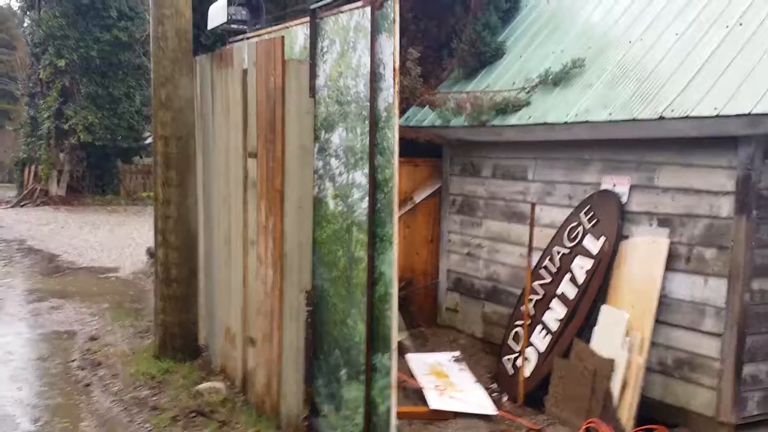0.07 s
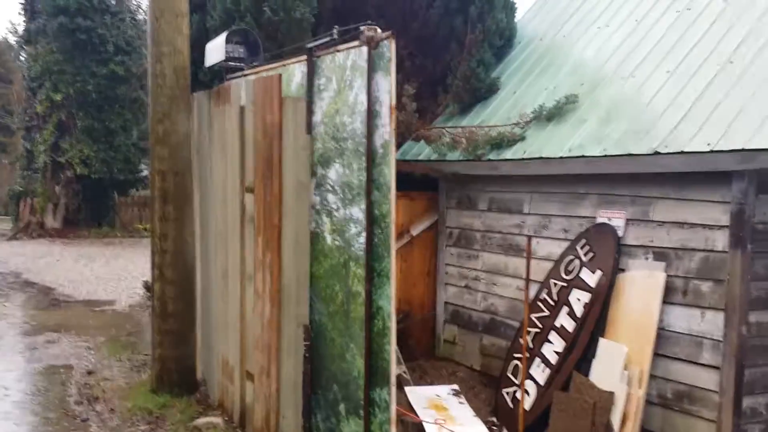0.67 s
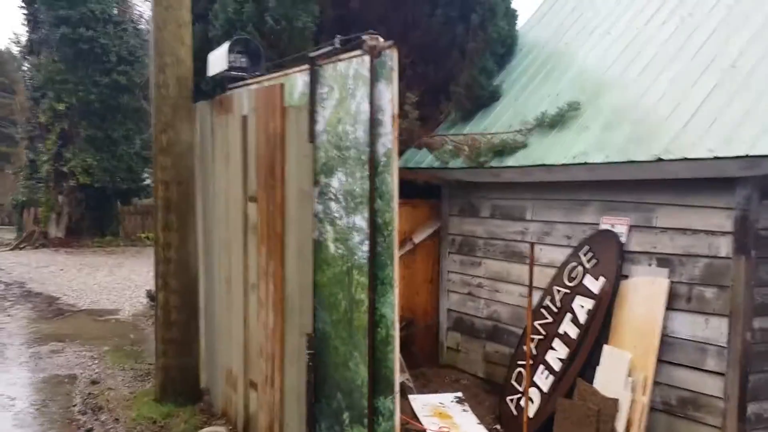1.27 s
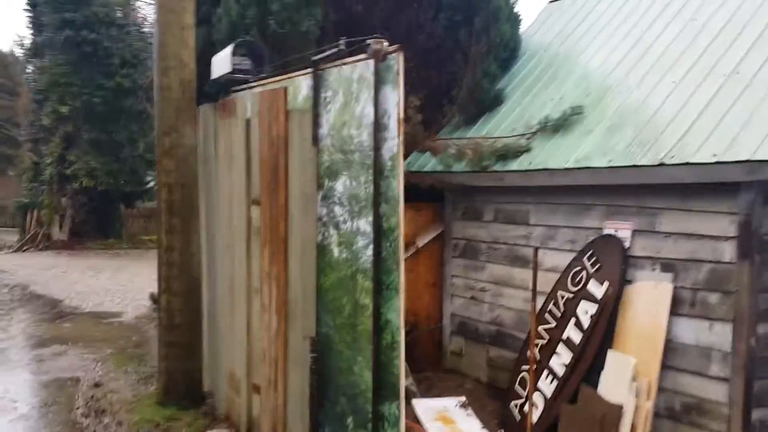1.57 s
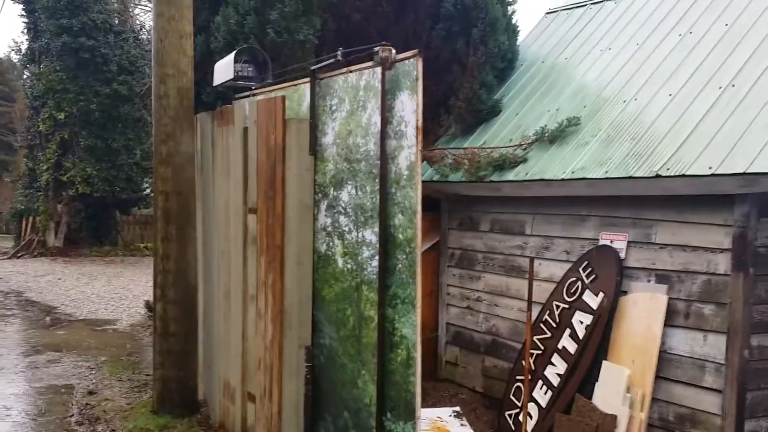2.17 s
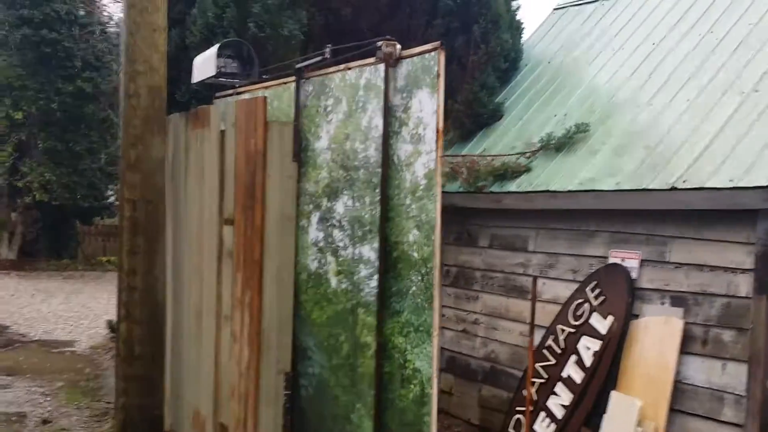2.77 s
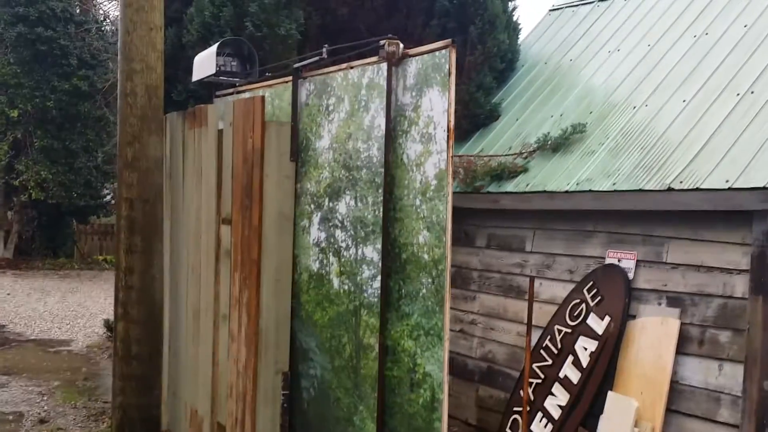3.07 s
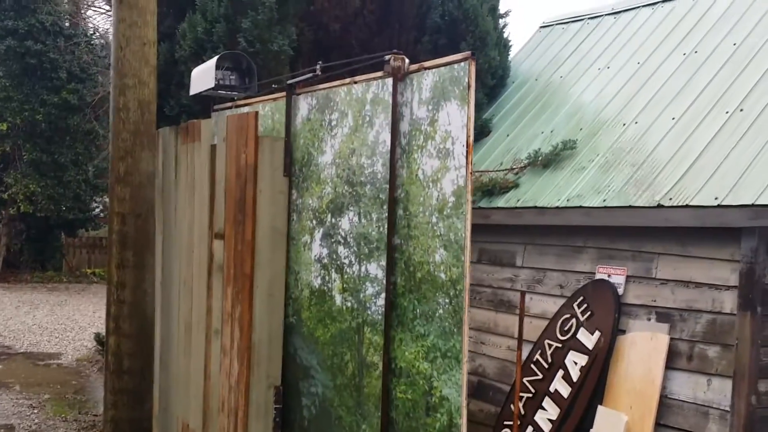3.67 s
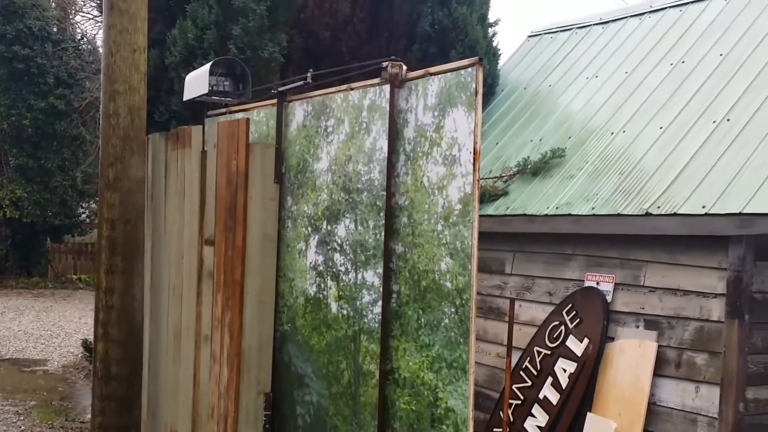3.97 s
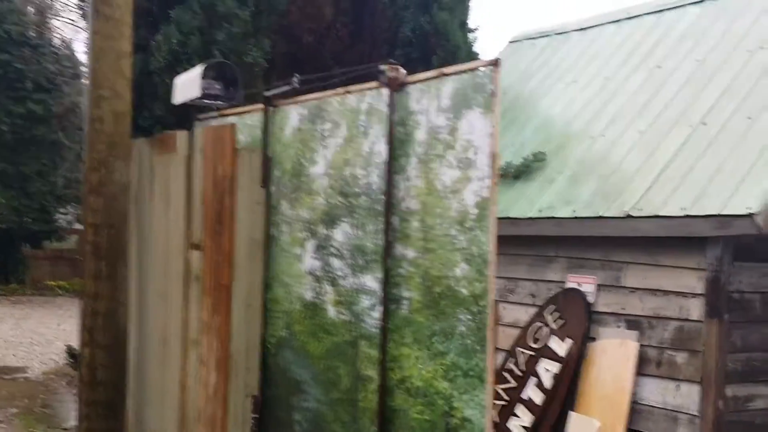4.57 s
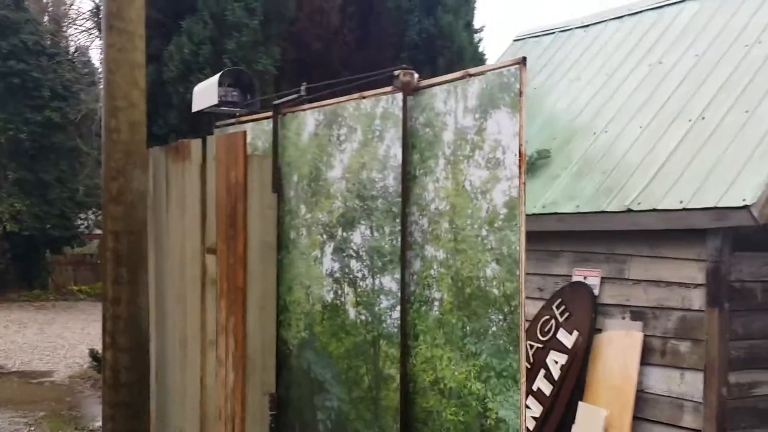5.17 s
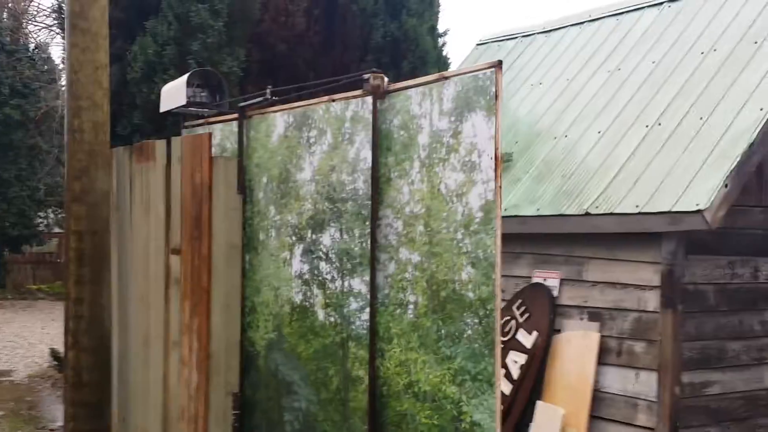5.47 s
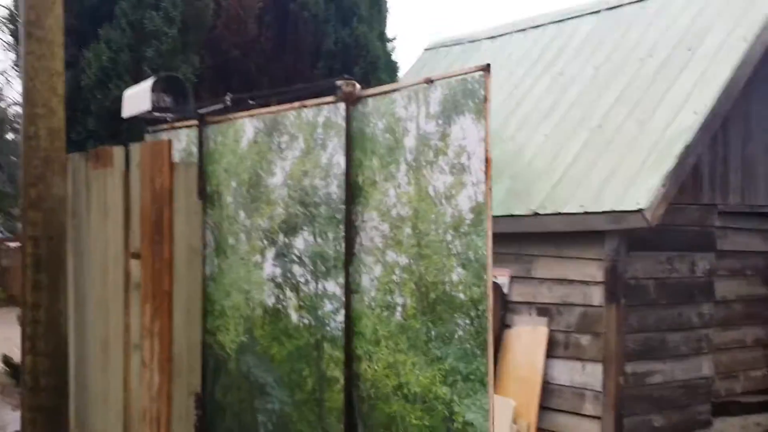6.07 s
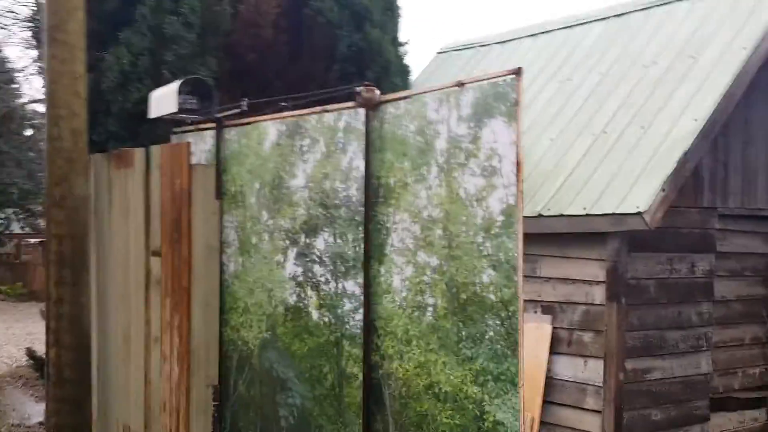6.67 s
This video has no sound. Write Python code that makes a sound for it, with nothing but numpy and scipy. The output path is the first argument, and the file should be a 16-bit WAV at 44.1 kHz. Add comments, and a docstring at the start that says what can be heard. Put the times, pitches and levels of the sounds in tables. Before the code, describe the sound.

Outdoor hiss and a faint idling engine fade in, a few metres from a motorised sliding gate. Its drive whirrs and drops in pitch, with one microphone pop, then the panel rolls out over a low hum. It rumbles and scrapes over rough spots, ticking, knocking and squealing thinly. The grinding grows harder and moves to the right, and the handheld microphone takes a soft bump late on.

```python
"""A wet yard, a handheld camera's two microphones a few metres from a motorised gate sliding out.
The drive whirrs and its motor hums; the rollers rumble through the panel, grind, and scrape over
rough spots; an edge squeals thinly and the frame knocks, with a few sharp ticks. Behind the gate
an engine idles in the outdoor hiss. The sound fades in, the right microphone pops once, and
later the camera body takes a soft knock."""
import sys
import numpy as np
from scipy import signal
from scipy.fft import rfft, irfft, next_fast_len
from scipy.io import wavfile
from scipy.ndimage import uniform_filter1d

SR = 44100
rng = np.random.default_rng(int(sys.argv[2]) if len(sys.argv) > 2 else 0)


def waveform_to_disk(signal):
    """Save audio, clipped to [-1, 1], as 16-bit WAV at the path in sys.argv[1]."""
    frames = np.transpose(np.atleast_2d(signal))
    scaled = np.clip(frames, -1, 1) * 32767
    samples = np.round(scaled).astype(np.int16)
    wavfile.write(sys.argv[1], SR, samples)


N = 304731
TIME = np.arange(N) / SR
SIZE = next_fast_len(N, real=True)
HZ = np.fft.rfftfreq(SIZE, 1 / SR)

# How alike the two microphones hear. Each row: frequency in Hz, likeness from 0 to 1.
MIC_LIKENESS = [(60, .96), (150, .98), (300, .97), (640, .9), (950, .65), (1400, .68), (1900, .2),
                (3200, .1), (7000, .12), (15000, .05)]
# Resonances of the gate panel. Each row: frequency in Hz, width in Hz, lift in dB.
PANEL_RESONANCES = [(263, 22, 4), (373.2, 12.6, 11.5), (446, 18, 5), (615, 81, 5), (730, 43, 4.5),
                    (880, 25, 4), (1054, 19, 7.5), (1143, 23, 8), (1217, 15, 3.5), (1249, 24, 8),
                    (1350, 16, 6), (1453, 12, 3), (1860, 200, 7)]


def gain_of(db):
    """Decibels to amplitude."""
    return 10 ** (np.asarray(db) / 20)


def unit_rms(x):
    """Scales to an rms of one."""
    return x / np.sqrt(np.mean(x ** 2) + 1e-20)


def spectrum(points, hz=HZ):
    """A frequency table, joined on a log-frequency axis."""
    f, value = np.transpose(points)
    return np.interp(np.log(hz + 1), np.log(f + 1), value)


def curves(rows):
    """Each column of a time table, at every sample."""
    times, *columns = np.transpose(rows)
    return [np.interp(TIME, times, column) for column in columns]


def lift(resonances):
    """Gain in dB that a body's resonances give at each frequency."""
    return sum(db / (1 + (2 * (HZ - hz) / width) ** 2) for hz, width, db in resonances)


def colour(x, db):
    """Filters by a gain in dB at each frequency."""
    return irfft(rfft(x, SIZE) * gain_of(db), SIZE)[..., :N]


def wander(rate_hz):
    """Random drift of unit rms, up to the given rate."""
    white = rfft(rng.standard_normal(SIZE))
    return unit_rms(irfft(white / (1 + (HZ / rate_hz) ** 4), SIZE)[:N])


def pair_noise():
    """White noise at two microphones: alike in the bass, unrelated in the treble."""
    a, b = rfft(rng.standard_normal((2, SIZE)))
    same = np.clip(spectrum(MIC_LIKENESS), 0, 1)
    mid, side = a * np.sqrt((1 + same) / 2), b * np.sqrt((1 - same) / 2)
    return irfft(np.array([mid + side, mid - side]), SIZE)[:, :N]


def friction(spectrum_db, rough_db, slip_hz):
    """Dense tiny slips that come in clumps, coloured by what they shake."""
    slips = pair_noise() * gain_of(rough_db * wander(slip_hz))
    return unit_rms(colour(slips, spectrum_db))


def sing(x, hz, width_hz):
    """Three passes through a resonance that follows the curve hz narrow noise to a fuzzy tone."""
    turn = np.exp(2j * np.pi * np.cumsum(hz) / SR)
    pole = np.exp(-np.pi * width_hz / SR)
    for _ in range(3):
        x = 2 * (turn * signal.lfilter([1 - pole], [1, -pole], x / turn)).real
    return unit_rms(x)


def strike(modes, t, pitch_hz, spread_octaves, steepness):
    """Dying modes, strongest near the blow's pitch, summed to a peak of one at each microphone."""
    ring = 0
    for hz, db, t60 in modes:
        falloff = (1 + (np.log2(hz / pitch_hz) / spread_octaves) ** 2) ** steepness
        phase = rng.random() + (1 - spectrum(MIC_LIKENESS, hz)) * rng.random((2, 1))
        ring += gain_of(db - 60 * t / t60) / falloff * np.sin(2 * np.pi * (hz * t + phase))
    return ring / abs(ring).max(axis=1, keepdims=True)


def place(mix, start, db, pan_db, sound):
    """Adds a short sound at its time, level and side."""
    part = mix[:, round(start * SR):][:, :sound.shape[1]]
    part += gain_of(db + np.array([[pan_db], [-pan_db]]) / 2) * sound[:, :part.shape[1]]


def yard(level_db=-45.5):
    """Even outdoor hiss, all around the microphones."""
    # The open air. Each row: frequency in Hz, relative level in dB.
    air = [(15, -45), (35, -32), (60, -3), (100, -2.5), (200, -6), (370, -8), (480, -17), (850, -42),
           (1400, -13.5), (1920, -10), (2500, -17), (3400, -18.5), (6200, -25.5), (14000, -33.5)]
    return gain_of(level_db) * friction(spectrum(air), rough_db=3.0, slip_hz=201)


def engine(crank_hz=16.42, unsteady=0.24):
    """A distant idle: only the low orders of the crank carry, throbbing once a turn."""
    # Engine orders. Each row: multiple of the crank speed, level in dB.
    orders = [(2, -88), (3, -53), (4, -61), (5, -58), (6, -63), (7, -59.5), (9, -69)]
    turns = crank_hz * np.cumsum(1 + 0.0025 * wander(2.8)) / SR
    idle = np.zeros(N)
    for order, db in orders:
        amplitude = gain_of(db) * np.sqrt(2) * (1 + unsteady * wander(2.8))
        idle += amplitude * np.cos(2 * np.pi * order * turns + rng.normal(0, 1.0))
    return idle


def roller_forces(uneven_db=1.13, uneven_hz=9):
    """Strength of rumble, grinding and hiss: uneven rolling plus a surge at every rough spot."""
    # Rolling builds as the gate comes out. Each row: time in seconds, rumble, grinding, hiss in dB.
    rolling = [(0.8, -47.5, -57, -52), (0.95, -44, -56, -49), (1.52, -49, -48.5, -50),
               (1.76, -43, -45, -50.5), (1.89, -43, -54, -53), (1.97, -46, -49, -50),
               (2.12, -41, -42.5, -48), (3.48, -39.5, -41, -46), (4.18, -40, -41.5, -47),
               (4.75, -38, -46, -46), (4.99, -40, -43.5, -46.5), (5.53, -39.5, -45, -46),
               (5.92, -40, -42.5, -46), (6.66, -38.5, -37, -44)]
    # Rough spots. Each row: start in seconds, rumble, grinding, hiss in dB, rise and fade in seconds.
    scrapes = [(1.498, -39, -34, -42.5, 0.015, 0.036), (1.649, -42, -32.5, -43, 0.0052, 0.023),
               (1.921, -57, -40, -45, 0.005, 0.041), (2.006, -44, -32, -44.5, 0.005, 0.062),
               (2.034, -32, -41, -56, 0.0053, 0.076), (2.139, -48, -41, -61, 0.038, 0.11),
               (2.232, -38.5, -30.5, -39.5, 0.024, 0.051), (2.514, -35.5, -40, -44.5, 0.013, 0.062),
               (2.81, -39.5, -35.5, -45, 0.063, 0.059), (3.113, -33, -35, -41.5, 0.0036, 0.032),
               (3.22, -43, -38, -49, 0.049, 0.097), (3.298, -50, -36, -39.5, 0.018, 0.022),
               (3.772, -35, -34, -46, 0.046, 0.079), (4.264, -37, -43, -60, 0.0035, 0.043),
               (4.436, -39, -55, -52, 0.012, 0.03), (4.52, -37.5, -38, -44, 0.039, 0.05),
               (4.675, -38, -33, -39, 0.008, 0.074), (4.753, -51, -31.5, -43, 0.0055, 0.053),
               (4.858, -39.5, -66, -49, 0.0025, 0.037), (5.15, -38, -36, -46, 0.028, 0.057),
               (5.183, -37, -33.5, -37.5, 0.0083, 0.075), (5.228, -44, -34, -47, 0.0046, 0.077),
               (5.35, -38, -36, -47, 0.023, 0.06), (5.501, -32.5, -27, -39, 0.0087, 0.038),
               (5.547, -33.5, -34, -48, 0.0072, 0.11), (5.612, -47, -31, -37, 0.012, 0.059),
               (5.665, -35, -38, -37.5, 0.016, 0.063), (5.837, -42, -48, -40, 0.0041, 0.042),
               (6.125, -50, -35, -50, 0.016, 0.019), (6.293, -55, -48, -39, 0.0073, 0.04),
               (6.401, -52, -45, -39.5, 0.0031, 0.015), (6.575, -39, -36, -48, 0.02, 0.03),
               (6.698, -39, -31, -40.5, 0.013, 0.046), (6.758, -49, -26, -45, 0.015, 0.046),
               (6.852, -29.5, -41, -43.5, 0.0041, 0.034)]
    power = gain_of(np.array(curves(rolling)) + uneven_db * wander(uneven_hz)) ** 2
    for start, rumble_db, grind_db, hiss_db, rise, fade in scrapes:
        age = TIME - start
        surge = np.clip(age / rise, 0, 1) * np.exp(-(np.maximum(age - rise, 0) / fade) ** 2)
        power += (gain_of([[rumble_db], [grind_db], [hiss_db]]) * surge) ** 2
    return np.sqrt(power)


def rumble(force):
    """The rollers shake the gate panel and its resonances."""
    # Panel rumble. Each row: frequency in Hz, relative level in dB.
    tone = [(30, -19), (70, -1), (130, 0), (190, 2), (290, 0.5), (380, -7), (480, -2), (700, -4.5),
            (1000, -7), (1600, -23), (3000, -42), (16000, -66)]
    return force * friction(spectrum(tone) + lift(PANEL_RESONANCES), rough_db=1.5, slip_hz=49.7)


def grinding(force, ring_width_hz=400, ring_lift_db=3.0):
    """Slips at the roller contact ring it lower, harder and further right as the gate comes out."""
    # The slips. Each row: frequency in Hz, relative level in dB.
    tone = [(200, -19), (600, -8), (950, 0), (1400, 0.5), (1800, -5), (2200, -3), (2900, -15), (4500, -44),
            (16000, -81)]
    # The contact. Each row: time in seconds, resonance in Hz, ringing in dB, left over right in dB.
    contact = [(1.6, 1780, -10, -1), (2.0, 1396, -6.5, -1.5), (3.85, 1470, -3.5, -1.5), (4.4, 1420, -1, -4),
               (4.78, 1338, 4.5, -9.5), (5.65, 1299, 1, -6.5), (6.3, 1337, 3, -9), (6.8, 1390, 7.5, -7.5)]
    hz, ring_db, pan_db = curves(contact)
    panel_db = lift(PANEL_RESONANCES)
    slips = friction(spectrum(tone) + panel_db, rough_db=1.0, slip_hz=120)
    ring = sing(friction(panel_db, rough_db=2.0, slip_hz=108), hz, ring_width_hz)
    share = gain_of(ring_db + ring_lift_db)
    blend = (slips + share * ring) / np.hypot(1, share)
    return force * blend * gain_of([pan_db / 2, -pan_db / 2])


def rubbing(force, hiss_db=3, grit_per_s=90, grit_db=-6, size_spread_db=2.0, grit_decay_s=0.00091):
    """Hiss along the track, with grains of grit cracking under the rollers."""
    # Rubbing hiss. Each row: frequency in Hz, relative level in dB.
    tone = [(1000, 3), (2500, -1), (3500, -1.5), (4700, 1), (6800, 1.5), (8400, -2.5), (10500, -7),
            (12000, -8), (14500, -16.5)]
    # Resonances of the steel track. Each row: frequency in Hz, width in Hz, lift in dB.
    track = [(4800, 39, 3), (5120, 50, 5.5), (5580, 38, 2), (6232, 30, 1.5), (6993, 45, 5.5),
             (11550, 260, 1), (9900, 120, 1.5), (10300, 50, 2), (10500, 50, 4)]
    hiss = friction(spectrum(tone) + lift(track), rough_db=0.5, slip_hz=400)
    hiss *= gain_of(hiss_db + 0.77 * wander(36))
    cracks = rng.random(N) < grit_per_s / SR
    sizes = gain_of(size_spread_db * np.minimum(rng.exponential(1, N), 4))
    bursts = signal.lfilter([1], [1, -np.exp(-1 / (grit_decay_s * SR))], cracks * sizes)
    grit = unit_rms(colour(pair_noise() * bursts, spectrum(tone)))
    return force * (hiss + gain_of(grit_db) * grit)


def whirr(upper_ratio=1.77, upper_width_hz=800, jitter=.018, jitter_hz=40):
    """Two fuzzy resonances of the drive tremble, swell and sink as the gate starts to move."""
    # The pitch sags as the drive takes up the load. Each row: time in seconds, pitch in Hz.
    sag = [(0.85, 2020), (1.27, 1760), (1.45, 1678), (1.62, 1520), (1.79, 1360)]
    # Swells. Each row: peak time in seconds, level in dB, upper resonance over lower in dB,
    # width of the lower in Hz, half length in seconds.
    swells = [(0.96, -48.5, -16, 1500, 0.21), (1.426, -45.5, -4, 360, 0.19), (1.723, -45.5, -17, 380, 0.13)]
    out = np.zeros((2, N))
    pitch = curves(sag)[0] * (1 + jitter * wander(jitter_hz))
    for peak_s, db, upper_db, width_hz, half_length in swells:
        span = abs(TIME - peak_s) < .5
        age, hz = TIME[span] - peak_s, pitch[span]
        drive = rng.standard_normal((2, N))[:, span]
        lower = sing(drive, hz, width_hz)
        upper = gain_of(upper_db) * sing(drive, hz * upper_ratio, upper_width_hz)
        out[:, span] += gain_of(db) * np.exp(-(age / half_length) ** 4) * (lower + upper)
    return out


def microphone_pop(level_db=-.3, corner_hz=98, damping=.63):
    """A sudden step at the right microphone; its bass cut turns it into a spike and an undershoot."""
    # The pop and its small rebound. Each row: start in seconds, relative size in dB.
    jumps = [(1.1823, 0), (1.1964, -20)]
    step = sum((-1) ** k * gain_of(db) * (TIME >= start) for k, (start, db) in enumerate(jumps))
    omega = 2 * np.pi * corner_hz
    bass_cut = signal.bilinear([1, 0, 0], [1, 2 * damping * omega, omega ** 2], SR)
    spike = uniform_filter1d(signal.lfilter(*bass_cut, step), size=3)
    return np.array([np.zeros(N), gain_of(level_db) * spike])


def ticks(crack_db=-16, wall_db=-29, lowest_hz=3000):
    """Each tick cracks and rings very short modes, with no bass; the shed wall answers faintly."""
    # Hard little ticks. Each row: start in seconds, level in dB, pitch in Hz, spread in octaves,
    # left over right in dB.
    hits = [(1.280, -28, 8300, .25, -2), (1.562, -10, 7500, 2.2, 7), (1.715, -19, 6700, 0.7, 0),
            (1.788, -22, 3930, 0.5, 12), (1.8274, -26, 6500, 0.32, -1), (2.012, -25, 7400, .2, 0),
            (2.511, -24, 8700, .4, 0), (2.680, -12.5, 8800, 2.4, 9), (2.8884, -24, 3900, .4, 7),
            (3.315, -22, 5600, .3, 3), (3.6473, -25, 7300, 0.67, -4), (5.007, -23.5, 3800, .2, -2),
            (5.3853, -32, 13500, .5, -3), (5.846, -20.5, 5600, 1.6, -1), (5.857, -27, 14000, .2, -2),
            (6.488, -23.5, 3700, 0.43, -4)]
    # What a tick rings. Each row: frequency in Hz, relative level in dB, seconds to fall 60 dB.
    modes = [(3860, 5, 0.0031), (5370, -4, 0.0045), (7000, -2, 0.0045), (8700, -5, 0.0025),
             (12100, 5, 0.0029), (13700, 2, 0.0026)]
    out, t = np.zeros((2, N)), np.arange(1024) / SR
    scatter = gain_of(crack_db - 60 * t / 0.0013) + gain_of(wall_db - 60 * t / 0.053)
    for start, db, pitch_hz, spread_octaves, pan_db in hits:
        ring = strike(modes, t, pitch_hz, spread_octaves, steepness=2)
        place(out, start, db, pan_db, ring + scatter * rng.standard_normal((2, len(t))))
    return signal.sosfilt(signal.butter(4, lowest_hz, "highpass", fs=SR, output="sos"), out)


def motor(level_db=-42, peak_s=3.3, build_db_per_s=2, ease_db_per_s=1.0, rise_s=0.072, drift_rad=.2):
    """Mains hum and gear tones come in, build and ease off, wavering with the load."""
    # Motor tones, mains hum first. Each row: frequency in Hz, relative level in dB,
    # depth of wavering, start in seconds.
    tones = [(119.9, 0, .12, 1.97), (267.5, -7, .35, 1.8), (263, -15, .6, 1.8), (599.7, -14.5, .5, 1.97)]
    # The hum's octave swells and dips slowly. Each row: time in seconds, level in dB.
    octave_levels = [(1.72, -48), (2.7, -51), (3.25, -44.5), (4.9, -44.5), (5.35, -48.5), (6.0, -46.5),
                     (6.5, -42), (6.9, -46)]
    hum = np.zeros(N)
    for hz, db, unsteady, start in tones:
        waver = (1 + unsteady * (wander(5.4) + 1j * wander(1.0))) / np.sqrt(1 + 2 * unsteady ** 2)
        running = np.clip((TIME - start) / rise_s, 0, 1)
        hum += running * gain_of(db) * np.sqrt(2) * (waver * np.exp(2j * np.pi * hz * TIME)).real
    past_peak = TIME - peak_s
    hum *= gain_of(level_db + np.minimum(build_db_per_s * past_peak, -ease_db_per_s * past_peak))
    octave_hz, octave_start = 2 * tones[0][0], octave_levels[0][0]
    swell = gain_of(curves(octave_levels)[0]) * np.clip((TIME - octave_start) / rise_s, 0, 1)
    return hum + swell * np.sqrt(2) * np.cos(2 * np.pi * octave_hz * TIME + drift_rad * wander(2))


def knocks(spread_octaves=0.47, contact_s=0.0019):
    """The frame knocks against its guide, and each blunt blow rings it for a moment."""
    # Blows. Each row: start in seconds, level in dB, pitch in Hz, left over right in dB.
    blows = [(2.037, -22, 664, -2), (2.046, -27, 151, 0), (2.048, -25, 1150, -2), (2.063, -29.5, 290, -2),
             (2.537, -29, 330, -3), (2.564, -26.5, 287, -4), (3.116, -24, 610, -3), (3.122, -30, 1100, -3),
             (4.448, -27.5, 523, -3), (4.496, -24.5, 1410, -4), (4.563, -22.5, 610, -4),
             (4.758, -24, 1400, -3), (4.861, -25, 290, -3), (5.518, -23, 1200, -5), (5.524, -19, 835, -5),
             (5.625, -23, 1320, -3), (5.672, -16, 1220, -6), (5.696, -26, 500, -3), (6.403, -25, 1350, -6),
             (6.705, -16.5, 1350, -6), (6.738, -23, 1400, -8), (6.776, -17, 1430, -8),
             (6.797, -16, 1300, -5), (6.809, -20, 1250, -7), (6.855, -20.5, 463, -2.5),
             (6.860, -24, 1090, -4)]
    # The frame's modes. Each row: frequency in Hz, relative level in dB, seconds to fall 60 dB.
    modes = [(133, -3, 0.087), (243.6, 6, 0.099), (290, 2, .09), (451, -1.5, 0.1), (607, 1, 0.085),
             (849, 0, 0.06), (1171, 2.5, 0.032), (1307, -6, 0.074), (1370, -2, 0.039), (1500, -1.5, 0.035)]
    out, t = np.zeros((2, N)), np.arange(8192) / SR
    attack = np.minimum(t / contact_s, 1)
    for start, db, pitch_hz, pan_db in blows:
        ring = strike(modes, t, pitch_hz, spread_octaves, steepness=1.19)
        place(out, start, db, pan_db, attack * ring)
    return out


def squeals(lower_ratio=0.591, rough_db=2.5, drift=.008, drift_hz=14, rise_s=.03, release_s=.03):
    """A rubbing edge sings roughly in two drifting high modes, broken up by tiny slips."""
    # Thin squeals. Each row: start and hold in seconds, upper and lower mode levels in dB,
    # upper mode in Hz, width in Hz.
    rubs = [(2.047, 0.78, -56.5, -60, 9800, 2193), (2.194, 0.1, -45.5, -41, 10140, 1500),
            (2.26, 0.57, -56.5, -61, 9960, 900), (2.827, 0.042, -41, -43, 10040, 1400),
            (3.278, 0.25, -48, -45.5, 10080, 1410), (4.32, 0.056, -47, -51, 10400, 2000),
            (4.516, 0.24, -50.5, -55.5, 10300, 2600), (6.238, 0.39, -59, -49, 8400, 700),
            (6.56, 0.1, -62, -46, 9750, 1000), (6.706, 0.077, -44.5, -42, 9500, 1600)]
    out, drive = np.zeros((2, N)), pair_noise()
    for start, hold, upper_db, lower_db, upper_hz, width_hz in rubs:
        span = (TIME >= start) & (TIME < start + hold + .5)
        age = TIME[span] - start
        swell = (1 - np.exp(-age / rise_s)) * np.exp(-np.maximum(age - hold, 0) / release_s)
        hz = upper_hz * (1 + drift * wander(drift_hz)[span])
        upper = gain_of(upper_db) * sing(drive[:, span], hz, width_hz)
        lower = gain_of(lower_db) * sing(drive[:, span], hz * lower_ratio, width_hz)
        out[:, span] += swell * (upper + lower)
    return out * gain_of(rough_db * wander(67))


def camera_bump(decay_s=0.012, left_db=-12):
    """A dull thud through the camera body, mostly at the right microphone."""
    # One soft knock: start in seconds, level in dB, pitch in Hz.
    knock = (6.012, -22, 103)
    start, db, hz = knock
    age = np.maximum(TIME - start, 0)
    thud = np.sin(2 * np.pi * hz * age) * np.exp(-(age / decay_s) ** 2 / 2)
    return gain_of([[db + left_db], [db]]) * thud


def scene():
    """The gate and its motor stand a few metres off, a little to the right."""
    # Balance of the two microphones. Each row: frequency in Hz, left over right in dB.
    balance = [(60, -2), (200, -2.5), (700, -3), (1300, -9), (2200, -4.5), (3100, 2), (4300, -2),
               (5500, -3), (7200, -1), (9500, -2), (12000, 1), (13700, 5.5)]
    rumble_force, grind_force, rub_force = roller_forces()
    outdoors = (rumble(rumble_force) + rubbing(rub_force) + squeals() + whirr() + motor()
                + engine() + yard())
    tilt_db = spectrum(balance) / 2
    outdoors = colour(outdoors, np.array([tilt_db, -tilt_db]))
    return outdoors + grinding(grind_force) + knocks() + ticks() + microphone_pop() + camera_bump()


def record(dry):
    """The sound fades in, and the top of the treble is cut off."""
    # The opening fade. Each row: time in seconds, gain.
    fade_in = [(.545, 0), (.58, .1), (.65, 0.35), (.72, 0.7), (.82, 0.99)]
    low_pass = signal.firwin(401, cutoff=14650, window=("kaiser", 8), fs=SR)
    return signal.oaconvolve(dry * curves(fade_in)[0], low_pass[None], "same")


dry = scene()
out = record(dry)
waveform_to_disk(out)
```